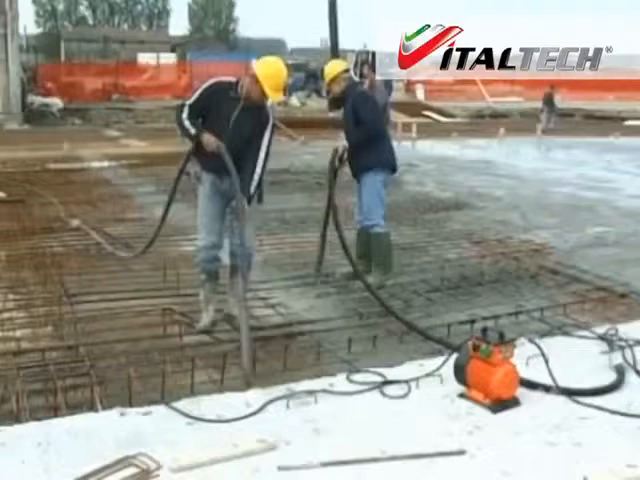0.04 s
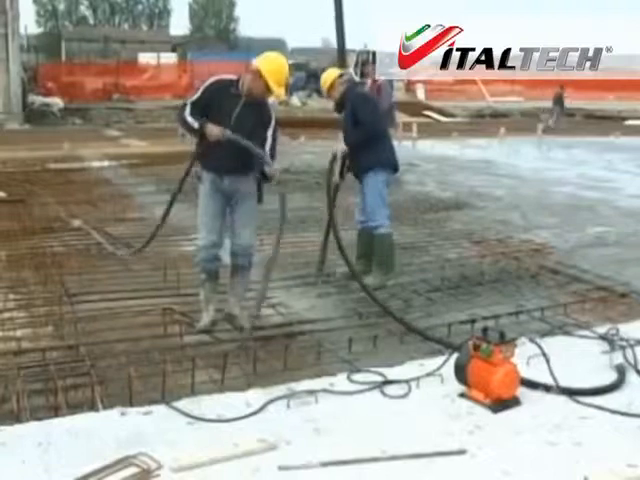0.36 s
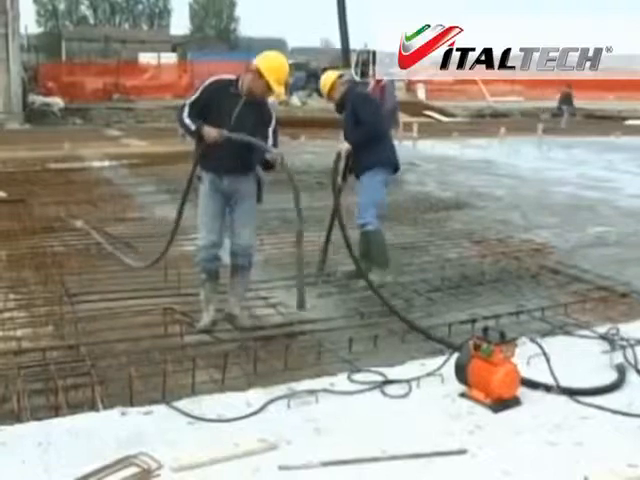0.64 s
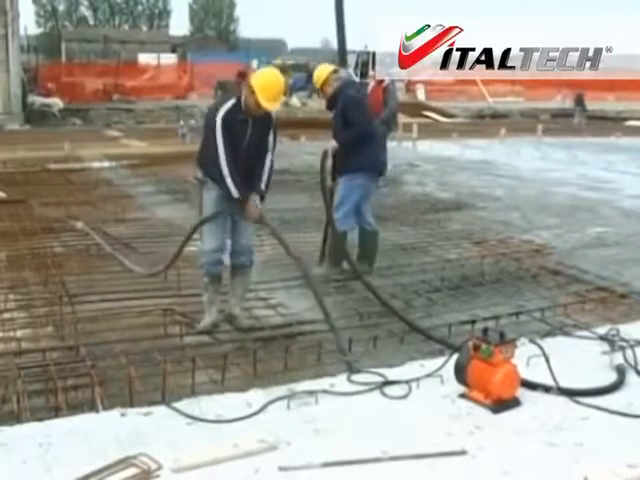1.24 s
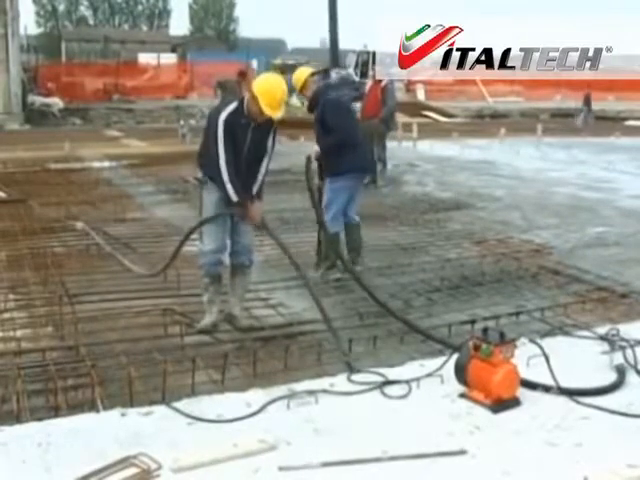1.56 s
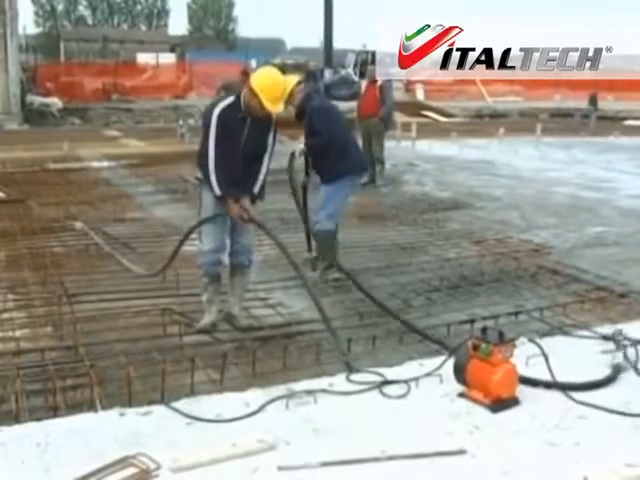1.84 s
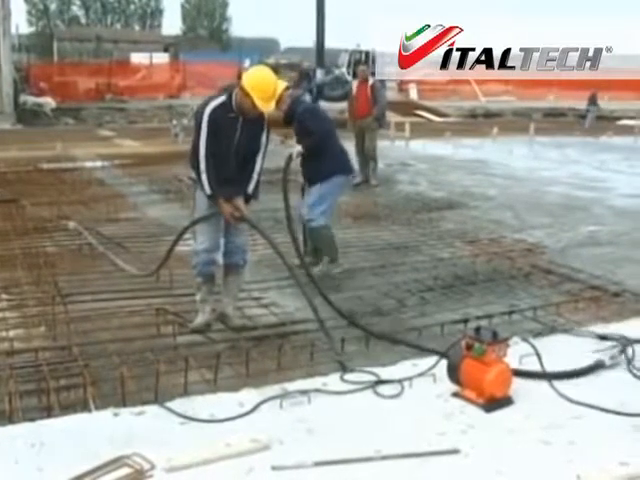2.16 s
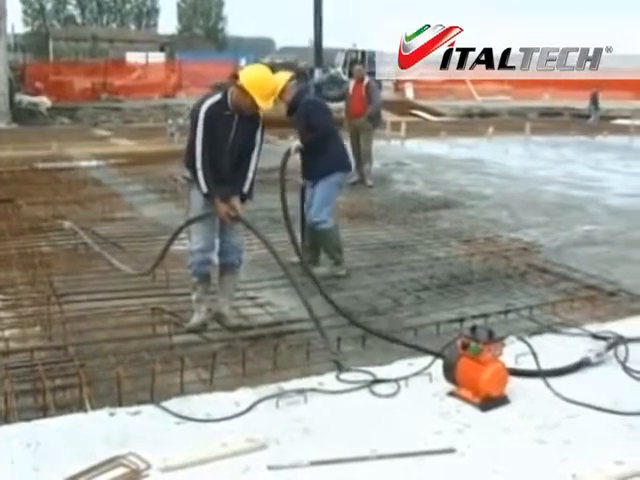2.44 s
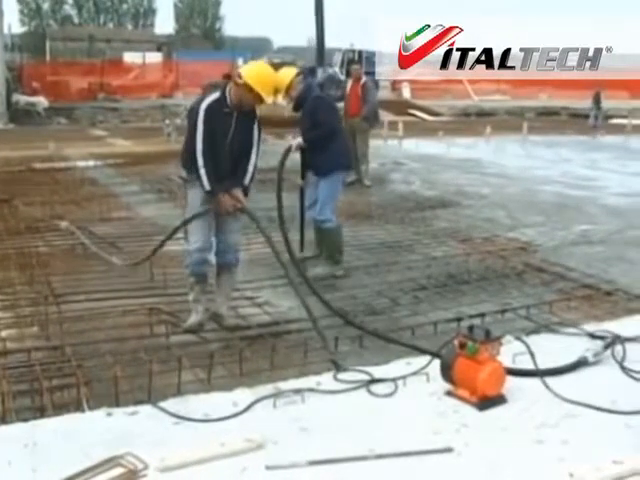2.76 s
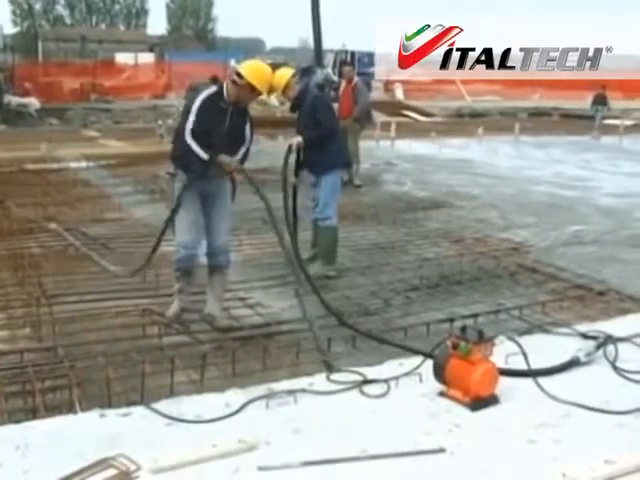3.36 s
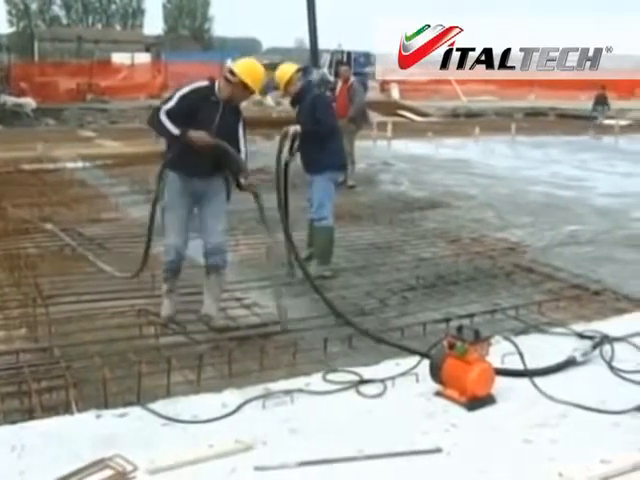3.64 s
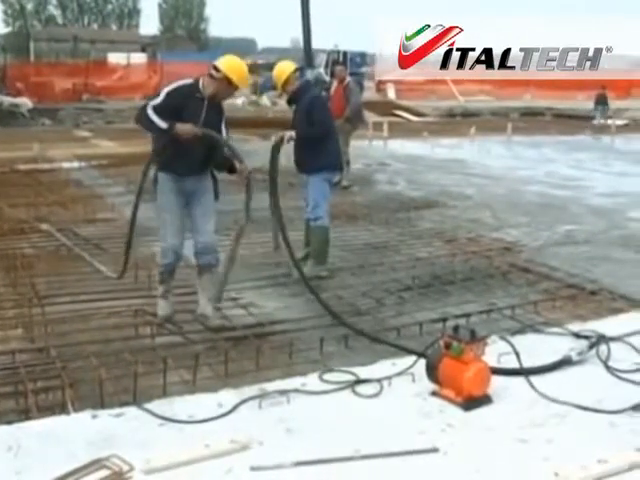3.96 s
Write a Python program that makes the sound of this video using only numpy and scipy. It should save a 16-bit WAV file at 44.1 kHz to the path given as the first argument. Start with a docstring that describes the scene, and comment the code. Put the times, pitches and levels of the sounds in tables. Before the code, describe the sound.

A concrete vibrator cuts in right away with a motor hum, a whining buzz and a brief metallic rattle. At about 1.3 seconds its poker rattles through steel bars, then sinks to a lower, duller drone in wet concrete. From about 3.1 to 3.6 seconds it rattles out and speeds up, the whine returning. Light knocks on the steel mesh and a low outdoor site rumble lie underneath.

```python
"""A flexible-shaft concrete vibrator on an open slab. The sound cuts in with an electric motor humming on
the ground and spinning a steel poker, whose rotating weight hums, bearings whine and casing buzzes.
After about a second the poker rattles down through the rebar, then slows under load and drones in the
wet concrete, which damps the buzz. Near three seconds it rattles out and speeds up again.
Light knocks on the mesh and a low site rumble accompany it."""
import sys
import numpy as np
from scipy import signal
from scipy.fft import rfft, irfft
from scipy.io import wavfile
from scipy.ndimage import uniform_filter1d

SR = 44100
rng = np.random.default_rng(int(sys.argv[2]) if len(sys.argv) > 2 else 0)


def put_to_file(sound):
    """Save the sound as 16-bit audio at rate SR, in the file named by the first command-line argument."""
    columns = np.atleast_2d(sound).T  # one column per channel
    safe = np.clip(columns, -1, 1)
    whole_steps = np.round(safe * 32767)
    wavfile.write(sys.argv[1], SR, whole_steps.astype(np.int16))


N = 176400
T = np.arange(N) / SR

# rotation of the poker: time_s, speed_hz
POKER_SPEED = [(.14, 169.8), (.3, 171.7), (.5, 173.9), (.75, 174.5), (1.2, 175), (1.28, 167.9),
               (1.36, 155.7), (1.48, 155.6), (1.62, 149.5), (2.2, 151.9), (2.85, 151.8), (3.29, 154.7),
               (3.4, 159.1), (3.55, 171.2), (3.7, 174), (4, 175.3)]
# hum of the rotating weight: time_s, fundamental_db, second_harmonic_db, third_harmonic_db
HUM_LEVELS = [(.14, -15.5, -36, -48), (1.19, -16, -35, -40), (1.27, -10.5, -54, -38),
              (1.35, -23, -34, -24.5), (1.58, -26, -33, -33), (1.76, -24.5, -28.5, -40),
              (1.93, -21.5, -24, -40), (2.1, -20.5, -29, -40), (2.4, -19.5, -23.5, -38),
              (2.88, -20, -22.5, -41), (3.0, -33, -22.5, -43), (3.1, -20, -17.5, -50),
              (3.25, -11, -19, -23.5), (3.4, -13.5, -20.5, -25), (3.47, -17.5, -32, -46),
              (3.58, -16, -32, -48), (4, -16.5, -43, -48)]
# bearing partials: speed_multiple, sideband_offset_hz, level_db
WHINE_PARTIALS = [(4, 0, -9), (5, 0, -13), (8, 0, 0), (9, 0, -11), (10, 0, -6), (11, 0, -11), (8, 23, -10),
                  (9, 23, -6), (10, 23, -7), (11, 23, -7), (12, 23, -11), (8, 66, -12), (9, 66, -8),
                  (10, 66, -11)]
# bearing whine: time_s, level_db
WHINE_LEVEL = [(.14, -36), (.45, -30.5), (.72, -27), (1.0, -30), (1.2, -37), (1.45, -43), (3.3, -54),
               (3.6, -35.5), (4, -33.5)]
# casing buzz, damped in concrete: time_s, level_db
BUZZ_LEVEL = [(.14, -18.5), (.25, -15), (.45, -18), (.7, -22.5), (1.0, -23), (1.17, -23.5), (1.3, -19),
              (1.45, -20.5), (1.68, -32), (2.55, -36), (3.05, -41), (3.18, -20.5), (3.29, -26), (3.45, -23),
              (3.59, -20.5), (3.7, -24.5), (4, -27)]
# spectrum of the buzz: frequency_hz, gain_db
BUZZ_SPECTRUM = [(200, -2), (450, 1), (700, 3.5), (930, -1.5), (1150, 5), (1500, -4.5), (2100, -0.5),
                 (2600, -8), (3100, -14.5), (3600, -10), (4500, -21), (6500, -16.5), (9000, -36.5),
                 (14000, -107.5)]
# casing resonances: pitch_hz, half_width_hz, gain_db
CASING_MODES = [(1950, 60, 5), (2133, 41, 6), (2147, 56, -18)]
# ring of the casing: time_s, level_db
CASING_LEVEL = [(.14, -26), (.5, -27.5), (1.2, -42), (1.6, -44.5), (3.1, -53), (3.6, -27.5), (4, -30.5)]
# contacts with the rebar, the three rings relative to level_db:
# peak_s, level_db, rise_s, hold_s, fall_s, casing_ring_db, low_ring_db, high_ring_db
RATTLES = [(0.191, -19.5, 0.066, 0.13, 0.1, -12, -6, -6),
           (0.222, -20.5, .002, 0.0072, 0.0057, -14, -4, 7.5), (0.251, -18, .005, .03, 0.044, -8, -10, 0),
           (1.26, -35, 0.12, .006, .02, -11, -16, -1), (1.270, -17, 0.00086, 0.006, 0.0073, -5, -12, 7),
           (1.28, -13.5, 0.0087, 0.025, 0.024, -6, -4.5, -0.5),
           (1.326, -17, 0.0057, 0.015, 0.0065, -2, -4.5, -4),
           (1.366, -18.5, 0.0022, 0.023, 0.038, -16, -10, -26),
           (3.155, -23, 0.0029, 0.011, .02, -17, -9, -4), (3.179, -32, 0.087, 0.33, 0.042, -15, -10, -9),
           (3.379, -28.5, 0.0045, 0.013, .02, -10, 3, 1), (3.413, -24.5, .004, .014, 0.009, -7, 9, 4),
           (3.462, -25, 0.021, 0.036, 0.038, -10, -1, -1), (3.571, -24, .003, 0.012, 0.03, 6, -3.5, -10)]
# spectrum of steel contacts: frequency_hz, gain_db
STEEL_SPECTRUM = [(200, -12), (700, -12), (1400, -5.5), (2200, -2.5), (2900, 5.5), (3300, 0), (4200, 1.5),
                  (7000, -1.5), (10000, -7), (12500, -11), (14000, -18), (15500, -32)]
# lower bar resonances: pitch_hz, half_width_hz, gain_db
LOW_BAR_MODES = [(5470, 98, 2.5), (5600, 90, 2), (5800, 69, 1), (6400, 93, -4)]
# upper bar resonances: pitch_hz, half_width_hz, gain_db
HIGH_BAR_MODES = [(7990, 390, -4), (8150, 180, -2), (8640, 150, 3.5), (9700, 450, -1.5), (10200, 170, -4),
                  (12200, 400, -6)]
# shudder of the whole mesh: frequency_hz, gain_db
SHUDDER_SPECTRUM = [(60, -16), (150, 7), (450, -5), (900, -5.5), (2000, -10), (4000, -17)]
# light knocks on the mesh: start_s, level_db
KNOCKS = [(0.73, -24.5), (1.014, -27), (1.539, -21.5), (1.628, -28), (2.329, -32.5), (2.556, -29),
          (2.799, -29.5)]
# spectrum of the knocks: frequency_hz, gain_db
KNOCK_SPECTRUM = [(300, -10), (1500, 0), (4000, 1.5), (7000, -5.5), (11000, -6.5), (13500, -22),
                  (15000, -34)]
# steady motor tones: pitch_hz, level_db
MOTOR_TONES = [(61, -45.5), (93, -43.5), (124, -35), (231.5, -33), (305, -43), (376.5, -33), (436, -33),
               (447, -32.5), (461, -37), (1027, -50), (1085, -37), (1130, -42.5)]
# rush of the motor and the site: frequency_hz, gain_db
RUSH_SPECTRUM = [(20, -20), (45, -9), (65, -9), (90, -2.5), (140, 0.5), (250, 0), (350, -3), (450, -5.5),
                 (520, -5.5), (680, -6.5), (930, -12), (1120, -9), (1450, -20), (1950, -19), (2800, -29),
                 (4500, -33), (7000, -35), (11500, -39.5), (14000, -62)]
# site rumble: time_s, level_db
RUMBLE_LEVEL = [(.14, -26), (.6, -41), (1.4, -30), (2.2, -33), (2.9, -25), (3.3, -29.5), (4, -34)]
# spectrum of the rumble: frequency_hz, gain_db
RUMBLE_SPECTRUM = [(20, -12), (45, -8.5), (65, 11.5), (100, -12), (160, 9), (400, -91)]
# likeness of left and right: frequency_hz, correlation
COHERENCE = [(30, 0.6), (65, 0.88), (130, 0.32), (300, 1), (1400, 0.93), (3000, 0.72), (6500, 0.53),
             (15000, 0.07)]
# level of left over right: frequency_hz, difference_db
LEFT_GAIN = [(60, -3), (110, 3), (200, 2.5), (380, 2), (700, 1.5), (1290, 0.5), (2370, 1), (4380, 1.0),
             (8090, 2), (14900, -0.5)]
# phase of left ahead of right: frequency_hz, lead_rad
LEFT_LEAD = [(100, .1), (300, 0.21), (1000, .05), (4000, 0.2), (6000, 0.92), (10000, .6), (14000, .2)]
# treble roll-off: frequency_hz, gain_db
TREBLE_ROLLOFF = [(11500, 0), (13200, -3), (14500, -9), (16000, -20)]

SHUDDER_DB, SHUDDER_CEILING_DB = -5.5, -20  # relative to the rattle; level at which it saturates
MESH_POWER_SHARE, MESH_DECAY_S, MESH_STEREO_SPREAD = .18, 0.0088, 0.25
KNOCK_DECAY_S = 0.01
LOADED_HZ, FAN_HZ, FAN_DB = 151, 3435, -49.5  # poker speed under load; the fan whistle at that speed
FAN_FOLLOW, FAN_DB_PER_HZ = .07, 0.1219  # share of relative speed change; gain per Hz of poker speed
RUSH_DB, RUSH_ROUGHNESS, RUSH_WAVER_DB = -21, 0.2, 1.0
START_S, CUTOFF_HZ = .131, 15500


def poker(turns):
    """Rotating unbalance: the weight hums, bearings whine, the casing buzzes twice a turn and rings."""
    hum = sum(undb(curve(HUM_LEVELS, column=k)) * tone(k * turns, waver_db=.8, jitter_rad=.033, rate_hz=22)
              for k in (1, 2, 3))
    whine = sum(undb(db) * tone(k * turns + offset_hz * T, waver_db=1, jitter_rad=.35, rate_hz=16)
                for k, offset_hz, db in WHINE_PARTIALS)
    chatter = strikes(2 * turns, scatter_db=2.5, decay_cycles=0.49, floor=0.29)
    buzz = unit(colour(stereo_noise() * chatter, BUZZ_SPECTRUM)) * undb(curve(BUZZ_LEVEL))
    casing = unit(resonate(stereo_noise() * chatter, CASING_MODES)) * undb(curve(CASING_LEVEL))
    return hum + whine * undb(curve(WHINE_LEVEL)) + buzz + casing


def rebar(turns):
    """Periodic impact: during each contact one blow a turn rings the steel and shakes the mesh."""
    blows = stereo_noise() * strikes(turns, scatter_db=3, decay_cycles=0.89, floor=0.27)
    clash = np.sqrt(1 - MESH_POWER_SHARE) * blows + np.sqrt(MESH_POWER_SHARE) * mesh(blows, count=240)
    layers = [unit(colour(clash, STEEL_SPECTRUM))]
    for modes in (CASING_MODES, LOW_BAR_MODES, HIGH_BAR_MODES):
        drive = stereo_noise() * strikes(turns, scatter_db=3, decay_cycles=0.79, floor=0.44)
        layers.append(unit(resonate(drive, modes)))
    power = np.zeros((4, N))  # overlapping contacts add in power, one row a layer
    for peak_s, db, rise_s, hold_s, fall_s, casing_db, low_db, high_db in RATTLES:
        flanks = np.minimum((T - peak_s) / rise_s, (peak_s + hold_s - T) / fall_s)
        envelope = np.exp(np.minimum(flanks, 0))
        power += (undb(db + np.array([[0], [casing_db], [low_db], [high_db]])) * envelope) ** 2
    ceiling = undb(SHUDDER_CEILING_DB)
    shudder_gain = ceiling * np.tanh(undb(SHUDDER_DB) * np.sqrt(power[0]) / ceiling)
    shudder = shudder_gain * unit(colour(rng.standard_normal((2, N)), SHUDDER_SPECTRUM))
    return shudder + sum(np.sqrt(p) * layer for p, layer in zip(power, layers))


def mesh(blows, count):
    """Modal superposition: blows excite many short steel modes, each radiating unequally to the sides."""
    t = T[:SR // 16]
    pitch, phase, size = rng.random((3, count))
    pitch_hz = 500 + 13500 * pitch
    modes = np.sin(2 * np.pi * (np.outer(pitch_hz, t) + phase[:, None])) * np.exp(-t / MESH_DECAY_S)
    weights = size * (1 + MESH_STEREO_SPREAD * rng.standard_normal(count) * np.array([[1], [-1]]))
    return unit(signal.fftconvolve(blows, weights @ modes, axes=1)[:, :N])


def knocks():
    """Damped transients: each knock on the mesh is a noise burst with exponential decay."""
    envelope = sum(undb(db) * (T >= start_s) * np.exp(-abs(T - start_s) / KNOCK_DECAY_S)
                   for start_s, db in KNOCKS)
    return envelope * unit(colour(stereo_noise(), KNOCK_SPECTRUM))


def motor(speed_hz):
    """Tonal and broadband machine noise: steady tones, a fan whistle that sags under load, rushing air."""
    hum = sum(undb(db) * tone(hz * T, waver_db=1, jitter_rad=1, rate_hz=9) for hz, db in MOTOR_TONES)
    fan_hz = FAN_HZ * (1 + FAN_FOLLOW * (speed_hz / LOADED_HZ - 1))
    fan_gain = undb(FAN_DB + FAN_DB_PER_HZ * (speed_hz - LOADED_HZ))
    fan = fan_gain * tone(np.cumsum(fan_hz) / SR, waver_db=1.5, jitter_rad=0.99, rate_hz=25)
    rough_air = stereo_noise() * (1 + RUSH_ROUGHNESS * wander(400))
    rush = colour(rough_air, RUSH_SPECTRUM) * undb(RUSH_WAVER_DB * wander(25.26))
    return hum + fan + undb(RUSH_DB) * unit(rush)


def rumble():
    """Band-limited noise: the low sound of the site slowly swells and fades."""
    return unit(colour(stereo_noise(), RUMBLE_SPECTRUM)) * undb(curve(RUMBLE_LEVEL))


def tone(cycles, waver_db, jitter_rad, rate_hz):
    """Random modulation: a partial wavers in phase and level."""
    phase = 2 * np.pi * cycles + jitter_rad * wander(rate_hz)
    return np.sqrt(2) * np.sin(phase) * undb(waver_db * wander(rate_hz))


def strikes(cycles, scatter_db, decay_cycles, floor):
    """Pulse-train envelope: one uneven, decaying blow per cycle above a steady floor."""
    size = undb(scatter_db * rng.standard_normal(N // 10))[cycles.astype(int)]
    return unit(size * np.exp(-(cycles % 1) / decay_cycles) + floor)


def resonate(x, modes):
    """Damped resonance: parallel modes, each response squared for steep flanks."""
    f = np.fft.rfftfreq(N, 1 / SR) + 1
    response = sum(undb(db) / (1 + 1j * (f * f - hz * hz) / (2 * f * half_width)) ** 2
                   for hz, half_width, db in modes)
    return irfft(rfft(x) * response, N)


def stereo_noise():
    """Partial coherence: left and right noise, mostly alike low down and diffuse in the treble."""
    correlation = np.clip(over_hz(COHERENCE), 0, 1)
    mid, side = rfft(rng.standard_normal((2, N)))
    spectrum = mid * np.sqrt(1 + correlation) + side * np.sqrt(1 - correlation) * np.array([[1], [-1]])
    return unit(irfft(spectrum, N))


def wander(rate_hz):
    """Low-pass noise: smoothed random steps of rms 1."""
    span = max(int(SR / rate_hz), 2)
    steps = rng.standard_normal(N)[np.arange(N) // span]
    return unit(uniform_filter1d(uniform_filter1d(steps, span), span))


def colour(x, rows):
    """Zero-phase filtering by a table of frequency_hz, gain_db."""
    return irfft(rfft(x) * undb(over_hz(rows)), N)


def over_hz(rows):
    """Interpolation in log frequency onto every spectral bin."""
    rows = np.array(rows)
    return np.interp(np.log(np.fft.rfftfreq(N, 1 / SR) + 1), np.log(rows[:, 0]), rows[:, 1])


def curve(rows, column=1):
    """Linear interpolation of one column in time."""
    rows = np.array(rows)
    return np.interp(T, rows[:, 0], rows[:, column])


def undb(db):
    """Decibels to amplitude ratio."""
    return 10 ** (np.asarray(db) / 20)


def unit(x):
    """Normalisation to rms 1."""
    return x / np.sqrt(np.mean(x ** 2))


def scene():
    """Superposition: the sources add, and level and phase cues place them a little to the left."""
    speed_hz = curve(POKER_SPEED)
    turns = np.cumsum(speed_hz * (1 + .001 * wander(10))) / SR
    sound = motor(speed_hz) + poker(turns) + rebar(turns) + knocks() + rumble()
    sides = np.array([[1], [-1]]) / 2
    placement = undb(sides * over_hz(LEFT_GAIN)) * np.exp(1j * sides * over_hz(LEFT_LEAD))
    return irfft(rfft(sound) * placement, N)


def record(dry):
    """Gating and band limiting: the treble rolls off, the sound cuts in, peaks clip, the top is cut."""
    cut_in = np.clip((T - START_S) / 0.005, 0, 1)
    clipped = np.clip(colour(dry, TREBLE_ROLLOFF) * cut_in, -1, 1)
    return signal.sosfilt(signal.ellip(8, .2, 70, CUTOFF_HZ, fs=SR, output="sos"), clipped)


dry = scene()
out = record(dry)
put_to_file(out)
```